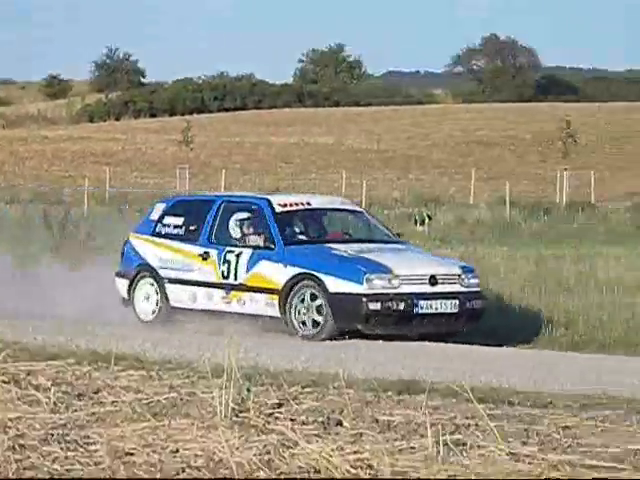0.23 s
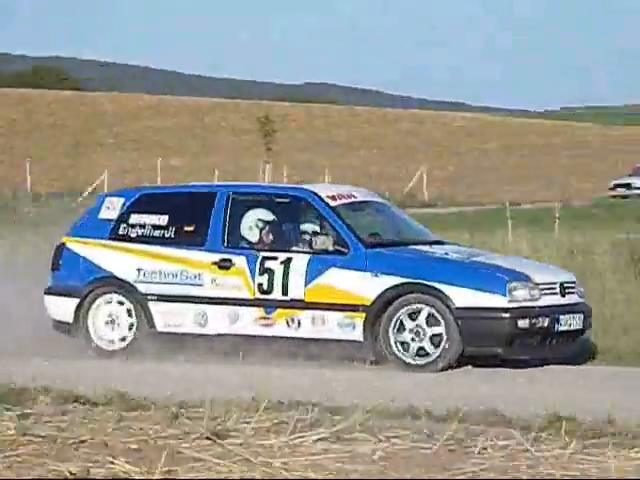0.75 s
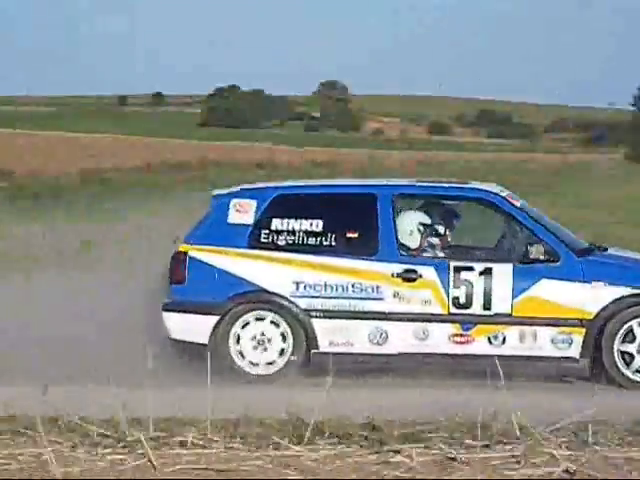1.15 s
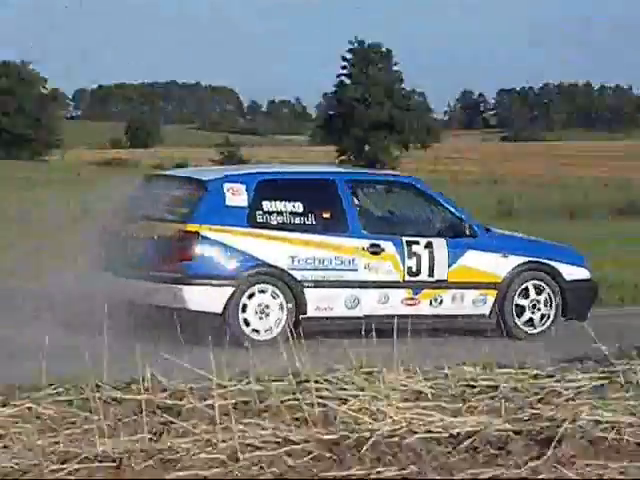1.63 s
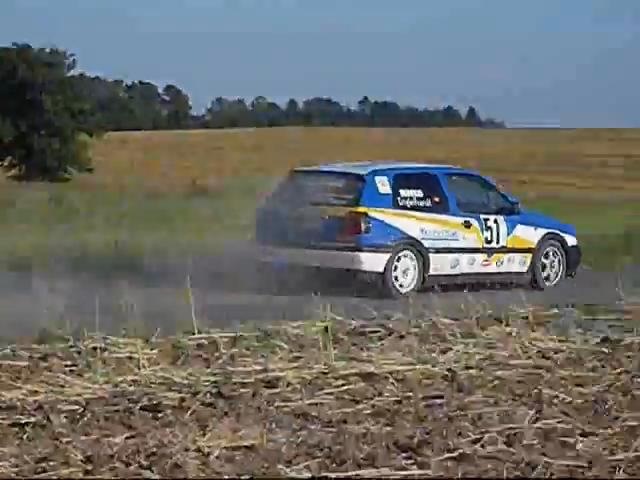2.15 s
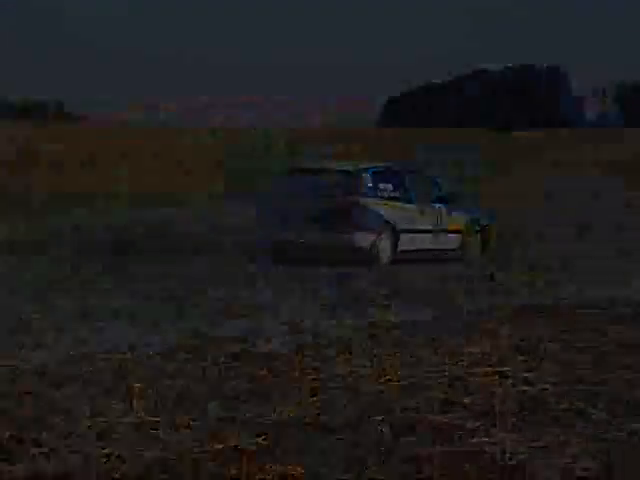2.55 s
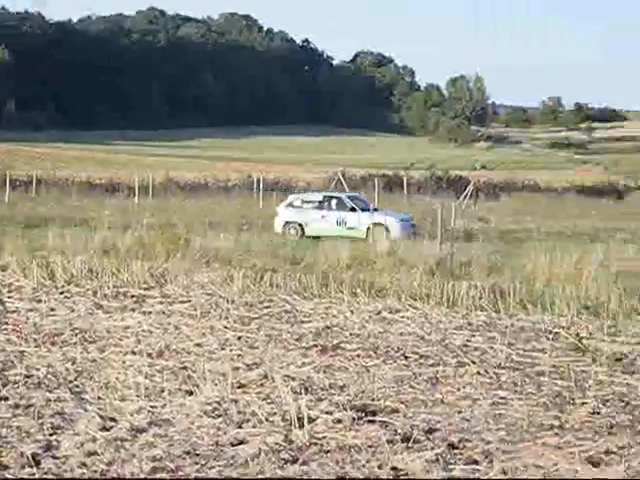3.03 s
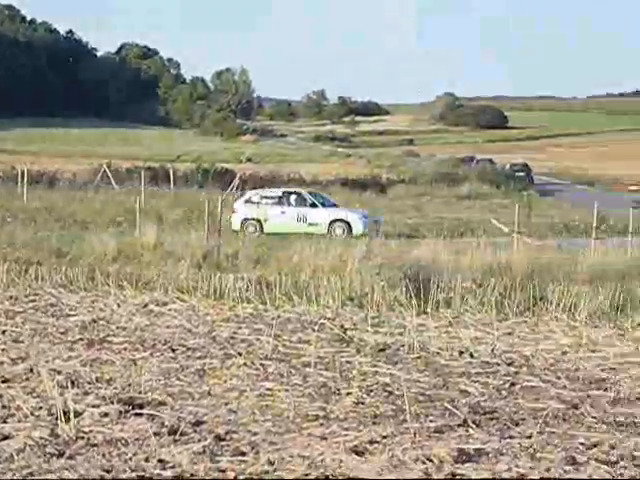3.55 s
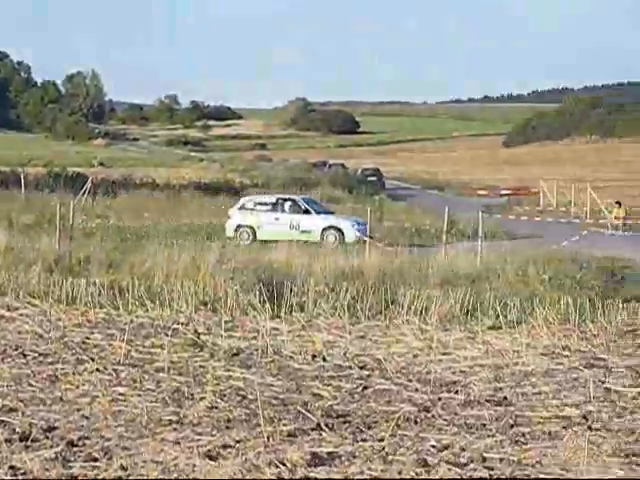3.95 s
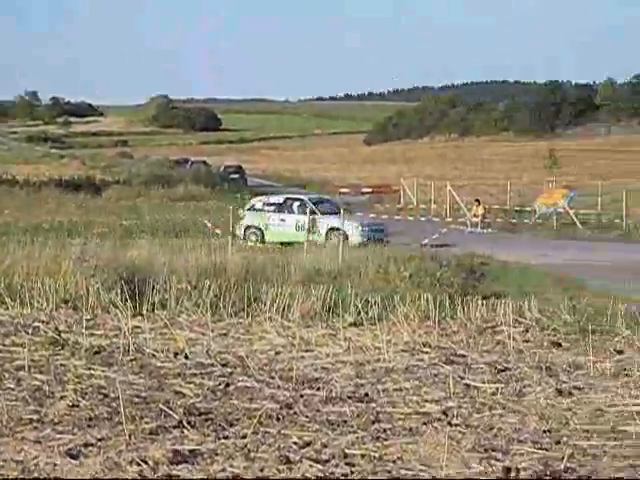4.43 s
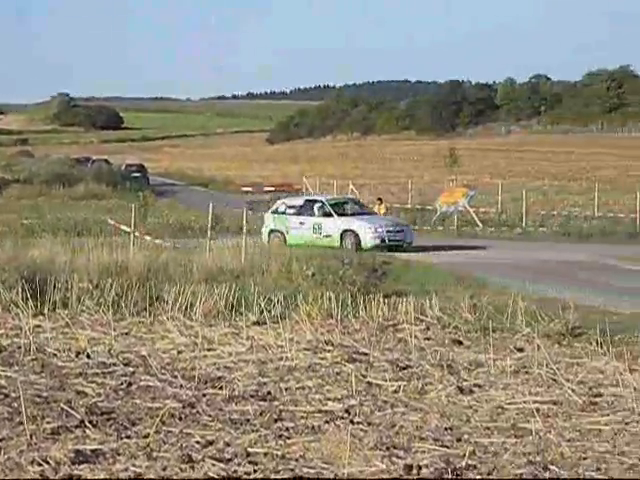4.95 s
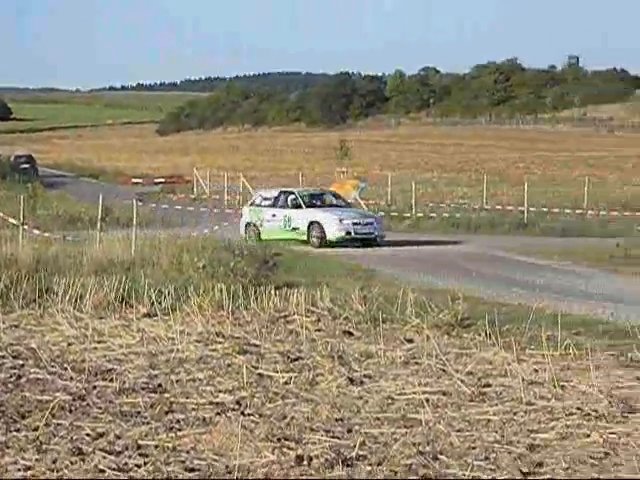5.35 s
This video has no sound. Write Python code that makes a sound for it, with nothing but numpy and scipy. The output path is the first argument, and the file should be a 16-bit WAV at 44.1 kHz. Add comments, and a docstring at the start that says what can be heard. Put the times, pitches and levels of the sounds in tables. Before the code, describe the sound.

Close gravel roar, stone pings and raspy engine drone stop abruptly; then a quiet far engine hum, low wind, finger rustle and sharp clicks.

```python
"""Rally car on gravel, then a far car

A rally car accelerates past a few metres away; a hard cut leads to a second car far off across a field.
Sine tones on multiples of the firing rate sing over crunching stones made from grainy, filtered noise.
In the quiet part fingers rustle and knock on the hand-held camera, heard as noise and pushes ringing its shell.
The camera samples 8 bits at 8 kHz and holds each sample, which mirrors every sound into the treble."""
import sys
import numpy as np
from scipy import signal
from scipy.fft import rfft, irfft, next_fast_len
from scipy.io import wavfile
from scipy.ndimage import uniform_filter1d

SR = 44100
rng = np.random.default_rng(int(sys.argv[2]) if len(sys.argv) > 2 else 0)


def wav_out(sig):
    """Save sig, one row per channel (or a flat mono array), as 16-bit PCM at SR to the path in sys.argv[1]."""
    wavfile.write(sys.argv[1], SR, np.round(np.clip(np.atleast_2d(sig).T, -1, 1) * 32767).astype(np.int16))


def ratio_of_db(decibels):
    """Turn decibels (scalar or array-like) into linear amplitude factors; 0 dB maps to 1."""
    return 10 ** (np.asarray(decibels, float) / 20)


N = 246959
T = np.arange(N) / SR  # time in seconds
CUT_S = 2.879  # the near car gives way to the far one
SAMPLE_HZ = 8001.5  # the camera's own sampling rate

# The far engine. Each row: time in seconds, firing rate in Hz, level of the note in dB.
FAR_ENGINE = [(2.9, 99.6, -44.5), (3.15, 95.2, -44), (3.36, 112.2, -42.5), (3.53, 129, -44),
              (3.63, 137.8, -39), (3.79, 155.4, -38), (4.03, 146.4, -38.5), (4.16, 140.6, -41),
              (4.41, 130.2, -45), (4.62, 121.1, -43), (4.88, 115.9, -45.5), (5.05, 114.9, -46.5),
              (5.25, 115, -59)]
# Camera shell resonances, from low thud to sharp tick. Each row: pitch in Hz, width in Hz, level in dB.
THUD_MODES = [(450, 100, -9.5), (658, 490, -6)]
CLACK_MODES = [(1900, 460, -8), (2310, 380, -2.5)]
TICK_MODES = [(2980, 500, 2.5), (3750, 710, -11.5)]


def unit(x):
    """Scale to an rms of 1."""
    return x / np.sqrt(np.mean(x ** 2))


def curves(table):
    """Columns of a table joined by straight lines in time."""
    s, *columns = np.transpose(table)
    return [np.interp(T, s, column) for column in columns]


def bumps(s, length, db):
    """Sum of bell-shaped swells (or dips) in dB."""
    return sum(d * np.exp(-((T - t) / w) ** 2) for t, w, d in zip(s, length, db))


def colour(x, spectrum, lo_hz=1., hi_hz=20000.):
    """Shape the spectrum by (Hz, dB) points, with soft shoulders at lo and hi; rms 1."""
    hz, db = np.transpose(spectrum)
    size = next_fast_len(N)
    f = np.fft.rfftfreq(size, 1 / SR) + 1
    shoulders = np.sqrt((1 + (lo_hz / f) ** 6) * (1 + (f / hi_hz) ** 6))
    gain = ratio_of_db(np.interp(np.log(f), np.log(hz), db)) / shoulders
    return unit(irfft(rfft(x, size) * gain, size)[:N])


def ring(x, hz, width):
    """Two-pole resonance, gain 1 at the centre."""
    return signal.lfilter(*signal.iirpeak(min(hz, SAMPLE_HZ / 2), hz / width, fs=SR), x)


def shell(x, modes):
    """A hard body rung by x: the sum of the resonances in a table of modes."""
    return sum(ratio_of_db(db) * ring(x, hz, width) for hz, width, db in modes)


def walk(rate):
    """Random levels held for 1 / rate seconds and smoothed twice; rms 1."""
    k = int(SR / rate)
    held = np.repeat(rng.standard_normal(N // 40), k)[:N]
    return unit(uniform_filter1d(uniform_filter1d(held, k), k))


def grit(share, spread_db):
    """Dense one-sample grains of uneven size over a bed of hiss; share is the grains' part of the power."""
    size = ratio_of_db(spread_db * np.minimum(rng.exponential(size=N), 4)) * rng.standard_normal(N)
    grains = size * (rng.random(N) < .04)  # 4 % of the samples carry a grain
    return np.sqrt(share) * unit(grains) + np.sqrt(1 - share) * rng.standard_normal(N)


def orders(hz, levels, wobble, flicker_db):
    """Tones on multiples of a base rate, whose pitch and strength waver a little at random."""
    phase = 2 * np.pi * np.cumsum(hz * (1 + wobble * walk(60))) / SR
    tones = 0
    for k, db in levels:
        gain = np.sqrt(2) * ratio_of_db(db + flicker_db * walk(40))
        tones = tones + gain * np.sin(k * phase + k * k)
    return tones


def wind_rumble():
    """Wind over the field: low noise that swells and lulls."""
    # Colour of the wind. Each row: frequency in Hz, relative dB per Hz.
    wind_spectrum = [(18, -25.5), (30, -8.5), (54, -15.5), (123, -4), (454, -5), (684, -11), (805, -9.5),
                     (1140, -19.5), (1500, -20.5), (1950, -47.5), (3300, -120)]
    # Swells and lulls. Each row: centre in seconds, length in seconds, change in dB.
    gusts = [(3.365, 0.16, -2), (4.34, 0.084, 1.5), (5.15, 0.097, -2), (5.362, 0.063, 3.5)]
    wind_db = -44 + bumps(*np.transpose(gusts))
    return ratio_of_db(wind_db + 1.3 * walk(19)) * colour(rng.standard_normal(N), wind_spectrum)


def far_tyres():
    """A narrow tyre hiss that falls off with time and is louder at high revs."""
    start_db, db_per_s, db_per_hz = -47.5, -4, 0.0876
    hz, _ = curves(FAR_ENGINE)
    hiss_db = start_db + db_per_s * (T - CUT_S) + db_per_hz * (hz - FAR_ENGINE[0][1])
    return ratio_of_db(hiss_db + 1.7 * walk(30)) * unit(ring(rng.standard_normal(N), 1850., 300.))


def far_exhaust():
    """A thin exhaust note: a single tone at the firing rate."""
    # Brief dips of the note. Each row: centre in seconds, length in seconds, change in dB.
    note_dips = [(3.509, .015, -9), (3.808, 0.013, -7), (4.441, .015, -8), (4.604, 0.011, -4)]
    hz, note_db = curves(FAR_ENGINE)
    fade_db_per_s = -27  # after the throttle is shut
    note_db = note_db + fade_db_per_s * np.maximum(T - FAR_ENGINE[-1][0], 0)
    note_db = note_db + bumps(*np.transpose(note_dips))
    return orders(hz, [(1, note_db)], wobble=0.0054, flicker_db=1.1)


def far_car():
    """The second car across the field, with the wind around it."""
    return far_exhaust() + far_tyres() + wind_rumble()


def finger_rustle():
    """Fingers rub the camera: gritty friction noise rings the shell and is also heard directly."""
    # Fingers sliding. Each row: centre in seconds, length in seconds, dB over the resting hand.
    slides = [(3.732, 0.056, 9.5), (4, 0.12, 4), (4.126, 0.052, 4), (4.301, 0.055, 12.5), (4.432, .02, 9),
              (4.56, 0.051, 7), (4.645, 0.035, 13), (4.726, 0.034, 7), (4.785, 0.033, 10.5),
              (4.945, .05, 3), (5.058, 0.067, -7.5), (5.29, 0.052, 8.5), (5.505, 0.061, 7.5)]
    rub = grit(share=0.42, spread_db=1.0) * ratio_of_db(1.2 * walk(26))
    grip_db, grip_db_per_s = -46.5, -2.5  # the resting hand creaks a little, less as it settles
    rustle_db = grip_db + grip_db_per_s * (T - CUT_S) + bumps(*np.transpose(slides))
    ringing = shell(rub, THUD_MODES + CLACK_MODES + TICK_MODES)
    return ratio_of_db(rustle_db) * unit(ringing + ratio_of_db(-13.0) * rub)


def shell_knocks():
    """Knocks on the camera: a short push rings the low modes, its roughness the high ones."""
    # Each row: start in seconds, push in dB, scrape in dB, contact time in ms, tick over clack in dB.
    knock_rows = [(3.010, -50, -41, 2.2, 10), (3.054, -43, -38, 3.1, -11), (3.064, -42, -26.5, 2.3, 1),
                  (3.927, -38, -34.5, 3.3, -19.5), (4.029, -31, -42, 2.1, 0), (4.052, -31, -33, 2.3, 9),
                  (4.103, -40, -38, 0.56, 9), (4.1105, -24, -8, 1.5, -1), (4.115, -1, -9, 0.53, 3),
                  (4.117, -34, -24, 1.9, -9), (4.278, -6, -8.5, 0.92, 20), (4.2818, -20, -24, 3.5, 18),
                  (4.302, -27, -32, 17, 8), (4.421, -31, -38, 8, 17.5), (4.453, -30.5, -30.5, 4.3, -2),
                  (4.583, -26.5, -27, 1.9, 6), (4.964, -33, -36, 1.8, 9), (5.493, -19.5, -27.5, 3, -8.5),
                  (5.594, -42, -32, 2, 1)]
    # The slowest shell resonance. Each row: pitch in Hz, width in Hz, level in dB.
    boom_modes = [(215.3, 9, -20)]
    boom_db, boom_per_sharp = -20, -.35  # over the thud; sharp knocks boom less (dB per dB)
    crack_db = -15.5  # broad crack of the contact itself, beside the ringing
    knocks = np.zeros(N)
    t = T[:9000]
    noises = rng.standard_normal((len(knock_rows), len(t)))
    for (s, push_db, scrape_db, ms, sharp_db), noise in zip(knock_rows, noises):
        tau = max(ms / 1000, 2 / SR)
        push = np.exp(-t / tau) - np.exp(-5 * t / tau)
        rough = push * noise
        crack = ratio_of_db(crack_db) * np.gradient(rough)
        parts = [(push_db + boom_db + boom_per_sharp * sharp_db, shell(push, boom_modes)),
                 (push_db, shell(push, THUD_MODES)),
                 (scrape_db - sharp_db / 2, shell(rough, CLACK_MODES) + crack),
                 (scrape_db + sharp_db / 2, shell(rough, TICK_MODES) + crack)]
        i = int(s * SR)
        for db, y in parts:
            knocks[i:i + len(t)] += (ratio_of_db(db) * y / np.abs(y).max())[:N - i]
    return knocks


def nose_to_tail(nose, back):
    """Blend from what the nose gives to what the tail gives as the car passes."""
    pass_s, turn_s = 1.215, 0.22  # the car shows its tail; time the change takes
    tail = .5 + .5 * np.tanh((T - pass_s) / turn_s)
    return nose + (back - nose) * tail


def near_gravel():
    """Tyres crunch gravel: lumpy grains for coarse stones, which ring the bodywork, and a steadier fine spray."""
    # Level of the fine spray. Each row: time in seconds, level in dB.
    spray_levels = [(0, -25), (.1, -24), (.5, -26.5), (.85, -24), (1.3, -25), (1.9, -29.5), (2.3, -30.5),
                    (2.87, -30)]
    # Loose patches. Each row: centre in seconds, length in seconds, coarse stones in dB, fine spray in dB.
    patches = [(0.368, 0.022, 6, -8), (0.458, 0.034, 3, 0.5), (.57, 0.084, 6.5, -3), (0.695, 0.023, 3, 0),
               (0.756, 0.024, 0.5, 3.5), (0.89, 0.062, -3, 2), (0.972, 0.012, 4.5, -8),
               (1.069, .03, 3.5, 0.5), (1.266, 0.029, 2, -1), (1.727, 0.01, 2.5, 6), (1.796, 0.026, 2, 1),
               (1.879, 0.028, 1.5, 0.5), (2.224, 0.0094, 5, 6), (2.85, .012, 4, 1.5)]
    # Colour of the gravel. Each row: frequency in Hz, relative dB per Hz.
    gravel_spectrum = [(18, -36), (30, -38), (49, -43), (85, -16), (113, -10.5), (139, -3.5), (188, -2),
                       (284, -2.5), (334, -14), (629, -6.5), (771, -12.5), (1010, -14.5), (1580, -13.5),
                       (1890, -13.5), (3950, -1.5), (5140, -52), (8690, -120)]
    # Panels rung by the gravel. Each row: pitch in Hz, width in Hz, level in dB.
    panels = [(525, 220, -8), (1005, 160, -0.5), (1384, 110, -9.5), (1620, 53, 3.5)]
    (spray_db,) = curves(spray_levels)
    s, length, coarse, fine = np.transpose(patches)
    coarse_db = spray_db + bumps(s, length, coarse)
    fine_db = spray_db + bumps(s, length, fine)
    spray = grit(share=0.3, spread_db=2.5) * ratio_of_db(0.3 * walk(24.95) + 0.52 * walk(90))
    crunch = spray * ratio_of_db(1.0 * walk(35.1))
    crunch = crunch + shell(crunch, panels)
    # dB over the spray, from the nose and from the tail
    rumble_db, crunch_db = nose_to_tail(-7, -8), nose_to_tail(0.5, -6)
    low = ratio_of_db(coarse_db + rumble_db) * colour(crunch, gravel_spectrum, hi_hz=873.0)
    middle = ratio_of_db(coarse_db + crunch_db) * colour(crunch, gravel_spectrum, lo_hz=1010.0, hi_hz=1690.0)
    high = ratio_of_db(fine_db) * colour(spray, gravel_spectrum, lo_hz=1680.0)
    return low + middle + high


def thrown_stones():
    """Single stones ping the underbody: short noise scrapes through two broad resonances at one pitch."""
    # Each row: start in seconds, peak in dB, pitch in Hz.
    stone_rows = [(0.217, -12, 3600), (0.455, -8.5, 1110), (0.676, -6.5, 770), (0.705, -3, 3700),
                  (0.845, -7, 3506), (0.866, -12, 1601), (0.914, -18.5, 3320), (1, -5, 3300),
                  (1.034, -9, 3300), (1.131, -12, 3580), (1.259, -11, 1007), (1.315, -21, 450),
                  (1.771, -15.5, 1287), (1.881, -11, 999), (2.222, -7.5, 3653)]
    stones = np.zeros(N)
    t = T[:1200]
    for (s, db, hz), noise in zip(stone_rows, rng.standard_normal((len(stone_rows), 1200))):
        scrape = noise * np.exp(-t * hz / 6)  # dies away over six cycles of the pitch
        ping = ring(ring(scrape, hz, .9 * hz), hz, .9 * hz)
        i = int(s * SR)
        stones[i:i + 1200] += ratio_of_db(db) * ping / np.abs(ping).max()
    return stones


def gearbox_whine():
    """Gearbox heard from behind: one wavering tone."""
    # Each row: time in seconds, pitch in Hz, level in dB.
    whine_points = [(1.3, 1340, -60), (1.55, 1330, -41), (1.9, 1280, -41), (2.2, 1250, -45),
                    (2.5, 1240, -60)]
    hz, db = curves(whine_points)
    return orders(hz, [(1, db)], wobble=.02, flicker_db=2.)


def near_engine():
    """Exhaust tones on multiples of the firing rate; their balance turns from nose to tailpipe."""
    # Each row: time in seconds, firing rate in Hz, level of the firing tone in dB.
    engine_points = [(0, 123.4, -33), (.3, 134.7, -28), (.44, 136.9, -27.5), (.61, 143.2, -32.5),
                     (.68, 148.3, -29), (.94, 142.8, -29), (1.06, 143, -23.5), (1.22, 143.8, -27),
                     (1.46, 143, -26), (1.65, 142.8, -25.5), (1.84, 145.1, -28), (1.93, 145.4, -23.5),
                     (2.2, 149.1, -23.5), (2.47, 152.9, -23), (2.66, 156.3, -21.5), (2.87, 156.4, -22.5)]
    # Overtones heard from the nose and the tailpipe. Each row: pitch in Hz, dB over the firing tone.
    nose_tones = [(250, 4.5), (272, -5), (290, -11), (375, -9.5), (420, -15), (560, -23), (720, -19.5),
                  (860, -24)]
    tail_tones = [(284, -3.5), (305, -11), (318, -10.5), (430, -7), (475, -22), (575, -8), (610, -8),
                  (632, -6), (715, -9.5), (765, -11.5), (792, -9), (858, -15), (880, -13), (915, -22.5),
                  (950, -23.5)]
    # Highest overtones. Each row: multiple of the firing rate, dB relative to the fifth.
    upper_tones = [(7, -12), (8, -14), (9, -16), (10, -15), (11, -17), (12, -18)]
    hz, tone_db = curves(engine_points)

    def overtone_db(k):
        """Level of the k-th multiple, read off at its present pitch."""
        nose = np.interp(k * hz, *np.transpose(nose_tones))
        back = np.interp(k * hz, *np.transpose(tail_tones))
        return tone_db + nose_to_tail(nose, back)

    levels = [(1, tone_db)]
    levels += [(k, overtone_db(k)) for k in range(2, 7)]
    levels += [(k, overtone_db(5) + db) for k, db in upper_tones]
    return orders(hz, levels, wobble=.002, flicker_db=0.9)


def near_car():
    """Engine, whine and gravel share brief level changes; the thrown stones do not."""
    # Mostly dips. Each row: centre in seconds, length in seconds, change in dB.
    car_dips = [(1.124, 0.075, -3.5), (1.284, .02, -3), (1.548, 0.015, -5.5), (1.75, .015, -2),
                (1.83, .02, 0.5), (2.246, 0.016, -3)]
    car = near_engine() + gearbox_whine() + near_gravel()
    return car * ratio_of_db(bumps(*np.transpose(car_dips))) + thrown_stones()


def scene():
    """The near car until the cut, then the far car and the handled camera; both channels alike."""
    near = np.clip((CUT_S - T) / 0.0017 + .5, 0, 1)  # the cut takes 1.7 ms
    far = far_car() + finger_rustle() + shell_knocks()
    return np.tile(near * near_car() + (1 - near) * far, (2, 1))


def top_cut(x):
    """Nothing passes above the cut-off."""
    return signal.sosfilt(signal.butter(12, 16720, fs=SR, output="sos"), x)


def record(dry):
    """Thin microphone bass; sample at 8 kHz, truncate to 8 bits and hold: mirror images and stair noise."""
    x = signal.sosfilt(signal.butter(2, 89.3, "high", fs=SR, output="sos"), dry)
    x = signal.sosfilt(signal.butter(6, SAMPLE_HZ / 2, fs=SR, output="sos"), x)
    held = (np.floor(T * SAMPLE_HZ) * SR / SAMPLE_HZ).astype(int)
    x = np.floor(np.clip(x[:, held], -1, 1) * 128) / 128  # 128 steps each way
    x = signal.sosfilt(signal.ellip(8, .1, 60, 15600, fs=SR, output="sos"), x)  # steep top at 15.6 kHz
    return top_cut(x)


dry = scene()
out = record(dry)
wav_out(out)
```